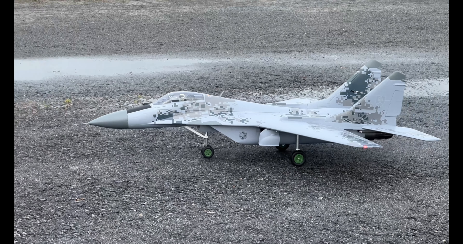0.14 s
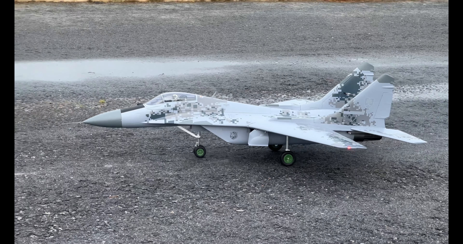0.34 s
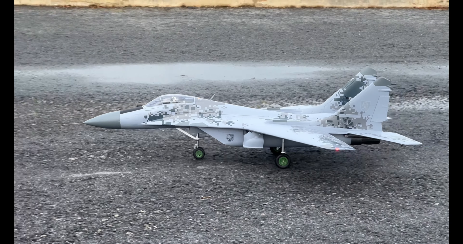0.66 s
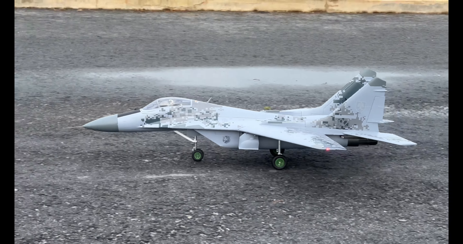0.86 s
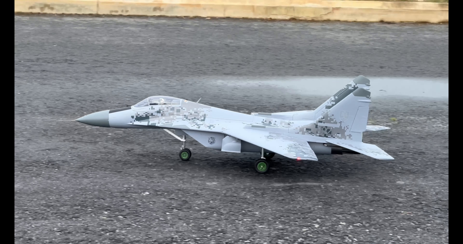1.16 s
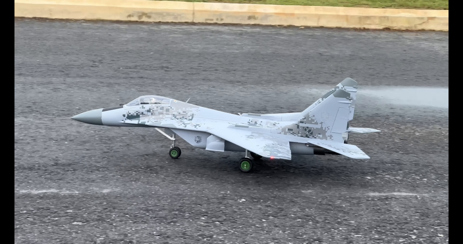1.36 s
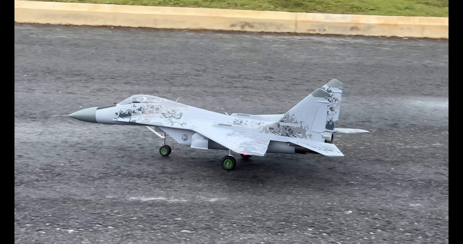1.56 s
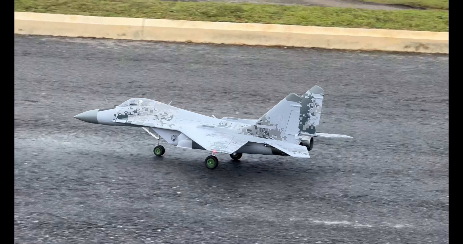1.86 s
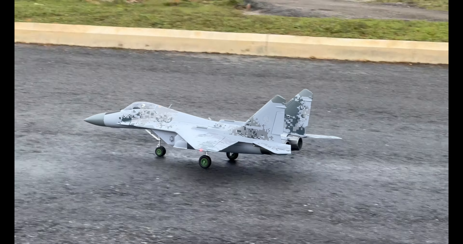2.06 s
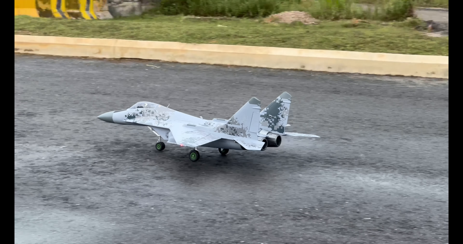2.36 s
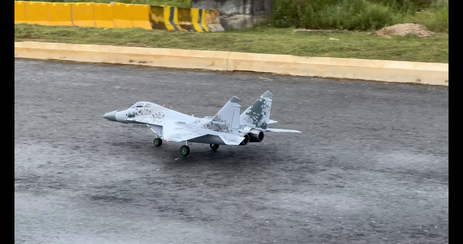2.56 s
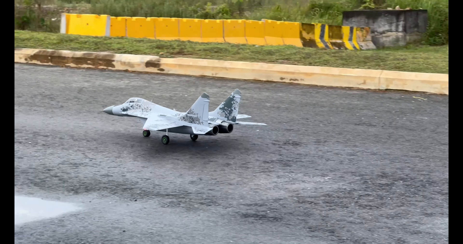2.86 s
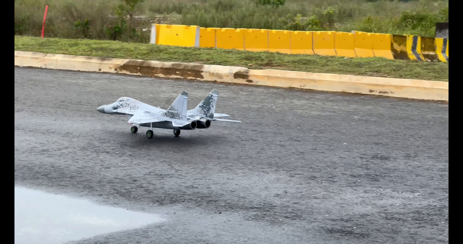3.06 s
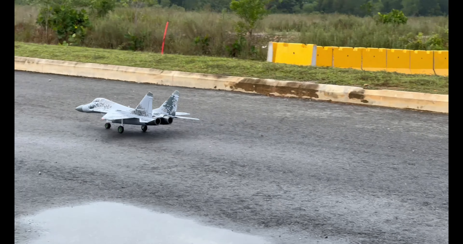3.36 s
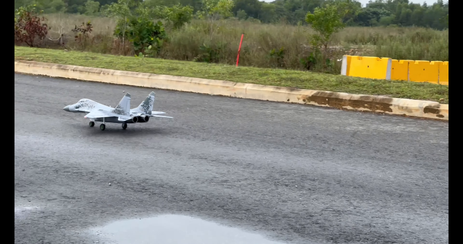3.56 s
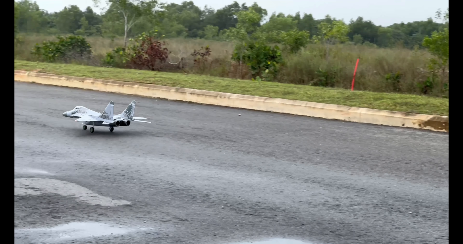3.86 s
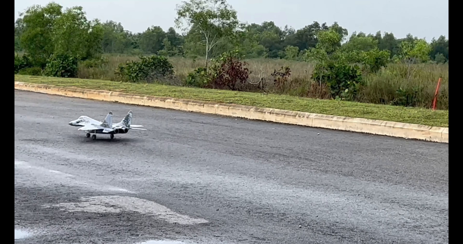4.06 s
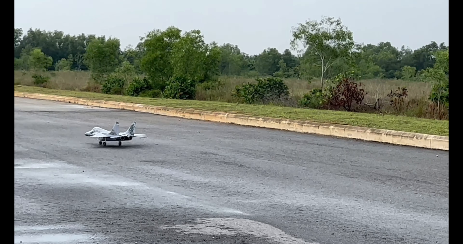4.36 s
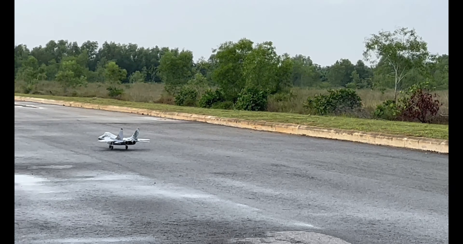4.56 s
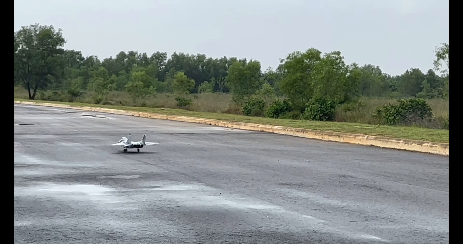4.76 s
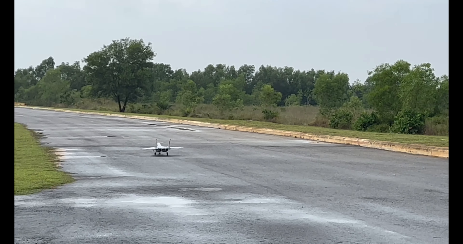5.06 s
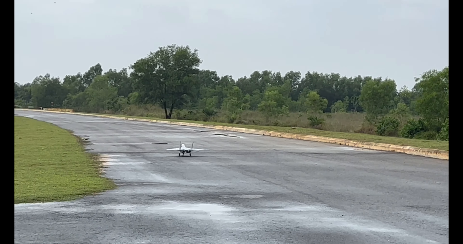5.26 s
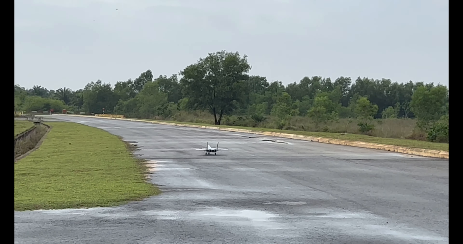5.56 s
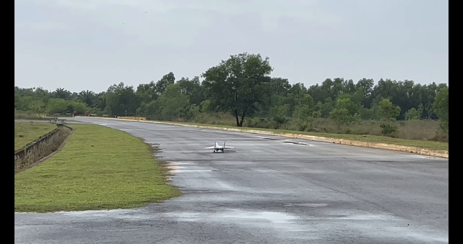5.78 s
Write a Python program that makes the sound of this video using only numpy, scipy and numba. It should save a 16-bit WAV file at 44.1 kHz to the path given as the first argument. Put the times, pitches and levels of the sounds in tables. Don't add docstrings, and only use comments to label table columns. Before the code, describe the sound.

Twin ducted fans start already running, with a shrill two-note whine, low rotational hum and hollow duct roar. Their pitch rises stepwise, with bright hiss growing on the way past. At full power they join into one wavering whistle, then flutter faster while fading down the open runway. Stereo phone pickup, dry and airy, with wind buffeting strongest around two seconds.

```python
import sys
import numpy as np
from scipy import signal
from scipy.fft import rfft, irfft
from scipy.io import wavfile
from scipy.ndimage import uniform_filter1d
from numba import njit

SR = 44100
rng = np.random.default_rng(int(sys.argv[2]) if len(sys.argv) > 2 else 0)


def decibels_to_gain(level_db):
    exponent = np.asarray(level_db, float) / 20
    return 10 ** exponent


def output_pcm(signal):
    pcm = np.clip(np.atleast_2d(signal).T, -1, 1) * 32767
    wavfile.write(sys.argv[1], SR, np.round(pcm).astype(np.int16))


N = 261072
T = np.arange(N) / SR
BLADE_COUNT = 9
SOUND_SPEED = 343

# start in seconds, spool time in seconds,
# fast blade rate in Hz, slow blade rate in Hz.
THROTTLE = [(.2, .13, 3590, 3215), (.33, .07, 3650, 3276), (.57, .105, 3746, 3353), (.98, .12, 3826, 3425),
            (1.29, .11, 3915, 3497), (1.4, .18, 4008, 3556), (1.58, .1, 4109, 3616),
            (1.93, .24, 4087, 3600), (2.17, .125, 4268, 3701), (2.52, .14, 4385, 3765),
            (2.77, .12, 4470, 3815), (2.94, .13, 4494, 3890), (3.08, .07, 4488, 3876),
            (3.21, .1, 4700, 3965), (3.31, .11, 5025, 4185), (3.42, .13, 5300, 4410),
            (3.55, .14, 5430, 4512), (3.69, .05, 5433, 4560), (3.74, .12, 5433, 4899),
            (3.86, .16, 5433, 5375), (4.02, .05, 5433, 5422)]
# fast in Hz, slow in Hz.
TAXI_HZ = (3310, 3025)
# time in seconds, slow fan below the fast one in Hz, its level against it in dB.
FULL_POWER_BEAT = [
    (4.09, 11, -18),
    (4.6, 3, -18),
    (4.85, 12, -9),
    (5.05, 16, -3),
    (5.3, 22, -3),
    (5.55, 27, -1),
    (5.92, 36, -2),
]
# time in seconds, speed in m/s.
RECEDE_SPEED = [(3.75, 0), (4.26, 4.35), (4.44, 4.6), (4.59, 6.4), (4.75, 6.8), (4.92, 9.3), (5.18, 11.7),
                (5.5, 12.6), (5.92, 14.9)]
# time in seconds, bearing of the phone from the nose in degrees,
# loss with distance in dB.
PATH = [(0, 80, 0), (1, 95, 0), (2, 112, 0), (3, 135, 0), (3.7, 150, 0), (4.35, 164, 0), (4.6, 169, 0),
        (4.8, 172, -2.5), (5.1, 175, -3), (5.4, 177, -7.5), (5.75, 179, -5.5), (5.92, 180, -6.5)]
# loudest bearing in degrees, level there in dB, fall ahead of it in dB per degree,
# fall behind it in dB per degree, most lost in dB.
BEAMS = dict(belly=(80, -13, .1, .115, 9), duct=(100, -22.5, .2, .03, 8), nozzle=(141, -19.5, .06, .15, 8),
         rush=(174, -19, .055, .5, 8), low=(178, -23, .065, .1, 8), blade=(135, -19, .13, .7, 9),
         tip=(150, -28.5, .2, .9, 14), sizzle=(163, -21.5, .145, 2.5, 9.5), mid=(104, -20.5, .33, .04, 9),
         haze=(170, -21, .035, .4, 7))
# time in seconds, half length in seconds, change in dB.
GROUND_ECHO = dict(belly=[(.1, .35, 1.5), (1.9, .2, -2)], duct=[(1.1, .5, 3), (2.5, .25, 2),
               (3.65, .2, 2.5), (3.95, .08, -2)], nozzle=[(.1, .3, -4), (.8, .3, 2), (2.05, .3, -5),
               (4.5, .15, -3)], rush=[(.05, .25, -4), (1.9, .4, -2.5), (4.1, .2, 1.5), (4.5, .2, -1.5)],
               low=[(2.1, .5, -9), (2.9, .5, -4)], blade=[(2.4, .3, 1.5), (4, .3, -2), (5.8, .4, 3)],
               tip=[(.7, .3, -3), (2.4, .6, -4)], sizzle=[(1.2, .4, 1.5), (2.45, .45, 2.5),
               (3.2, .12, -2.5), (3.65, .2, 1.5), (.1, .5, -3.5), (5.15, .25, -1.5)], mid=[(5.35, .3, -7),
               (2.8, .5, -3)], haze=[(2.7, .3, -4), (3.45, .55, -14)])

# blade tone, 2nd and 3rd multiple, all in dB.
FAST_FAINT_DB = (-39, -42, -50)
SLOW_FAINT_DB = (-40, -46, -51)
# time in seconds, half length in seconds, level in dB.
FAST_TONE = [(.3, .07, -22), (.44, .13, -27.5), (.62, .13, -22), (.96, .13, -22.5), (1.2, .09, -35),
             (1.33, .07, -27), (1.64, .07, -28), (1.77, .15, -23.5), (2.06, .13, -28), (2.31, .14, -26.5),
             (2.52, .14, -27.5), (2.9, .1, -30), (3.08, .2, -28), (3.41, .1, -26), (3.54, .1, -22),
             (3.76, .15, -28), (3.93, .08, -23), (4.02, .05, -28), (4.12, .045, -20), (4.21, .04, -20),
             (4.335, .055, -21), (4.42, .035, -25), (4.5, .06, -25), (4.6, .09, -18), (4.73, .08, -28),
             (4.87, .1, -26), (5.03, .1, -22), (5.2, .15, -32), (5.72, .35, -31)]
FAST_UPPER = [
    [(.13, .15, -37), (.35, .06, -29), (.48, .14, -25), (.9, .35, -41), (3.3, .07, -29), (3.9, .5, -35), (4.3, .06, -30), (4.48, .05, -35), (4.7, .07, -35), (5.6, .1, -42)],
    [(.45, .15, -36), (.95, .3, -41), (1.3, .2, -33), (1.8, .15, -41), (2.15, .15, -31), (2.47, .22, -29), (2.9, .3, -33), (3.33, .09, -22), (3.46, .07, -32)],
]
SLOW_TONE = [(.05, .22, -24), (.26, .1, -27), (.7, .38, -32), (1.05, .1, -36), (1.28, .07, -32),
             (1.45, .07, -28), (1.6, .07, -27), (1.95, .3, -33), (2.23, .13, -32), (2.45, .14, -33),
             (3.08, .2, -33), (3.31, .07, -35), (3.45, .15, -35), (3.62, .07, -32), (3.86, .12, -26),
             (4.02, .1, -33)]
SLOW_UPPER = [
    [(.6, .3, -36), (1.25, .17, -43), (1.78, .13, -28), (2.05, .2, -35), (2.5, .3, -42), (3.77, .1, -42)],
    [(1.38, .06, -41), (1.72, .17, -31), (1.97, .2, -30), (2.3, .25, -29), (2.62, .2, -29), (2.9, .18, -27), (3.9, .1, -41)],
]
# time in seconds, half length in seconds, level in dB.
FAST_SHAFT = [
    (.3, .14, -19),
    (.5, .1, -21.5),
    (.85, .15, -27),
    (1.6, .15, -24),
]
# time in seconds, level in dB.
SLOW_SHAFT = [(0, -28), (.3, -23), (.9, -22), (1.3, -26), (1.65, -22), (2.2, -38), (2.6, -31), (3.8, -36),
              (4.05, -27), (4.9, -29), (5.2, -34), (5.92, -36)]

# centre in Hz, width in Hz, level in dB.
LOW_HISS = [(2054, 1200, 4), (2830, 2100, 2)]
BLADE_HISS = [(5980, 840, 0.9), (7060, 730, -0.54)]
TIP_HISS = [(8500, 1300, 0), (9700, 1400, 0)]
SIZZLE = [(11000, 1600, 1), (12400, 1800, -1), (13900, 1800, -1), (15300, 1800, -4)]
HAZE_BED = [(3600, 2100, 0), (5080, 1300, 0)]
BELLY = [(415, 70, 1), (345, 80, -3), (265, 80, -5.5)]
DUCT_BED = [(747, 83, -3.5), (1150, 300, .7), (1820, 280, -4.5)]
# time in seconds, half length in seconds, shift in Hz.
NOZZLE_BEND = [(4.1, .85, -100)]
RUSH_BEND = [
    (.7, .7, 250),
    (1.55, .3, -180),
]

# time in seconds, half length in seconds, level in dB.
GUSTS = [(.2, .06, -27), (.33, .06, -29), (1.27, .08, -22), (1.38, .1, -25), (1.62, .15, -26),
         (1.88, .06, -14), (2.02, .14, -15), (2.42, .17, -27), (2.85, .04, -33), (3.12, .1, -31),
         (4.1, .2, -35), (4.53, .06, -27), (4.77, .1, -33), (5.15, .1, -28), (5.6, .35, -36)]
# centre in Hz, width in Hz, level in dB.
WIND_COLOUR = [(52, 14, -4), (64, 20, 1), (85, 30, 0), (130, 70, -11)]
FIELD_RUMBLE = [(129, 60, 0), (190, 76, 0)]
# frequency in Hz, left ahead of right in radians.
PORT_PHASE = [(0, 0), (2600, 0), (3300, .6), (4300, 0), (8800, 0), (9000, -1.4), (9800, -2.7),
              (10400, -3.45), (11800, -6.0), (12300, -6.5), (13400, -8.8), (14200, -9.9), (15200, -11.9),
              (15700, -12.57)]
# frequency in Hz, diffuse part that differs in dB, left louder than right in dB.
PORT_SPREAD = [(50, -30, .3), (130, -18, 1.5), (350, -26, .6), (800, -19, 1.2), (1500, -23, .1),
               (2300, -25, 0), (3400, -14, -.3), (4600, -21, 0), (7000, -29, 0), (12000, -24, 0)]


def fans():
    fast_hz, slow_hz = blade_rates()
    fast_db = tone_levels(FAST_TONE, FAST_UPPER, FAST_FAINT_DB)
    slow_db = tone_levels(SLOW_TONE, SLOW_UPPER, SLOW_FAINT_DB)
    below_hz, below_db = columns(FULL_POWER_BEAT)
    met = T > FULL_POWER_BEAT[0][0]
    slow_hz = uniform_filter1d(np.where(met, fast_hz - below_hz, slow_hz), size=600)
    slow_db = uniform_filter1d(np.where(met, fast_db + below_db, slow_db), size=600)
    fast_db = fast_db - met * 10 * np.log10(1 + decibels_to_gain(2 * below_db))
    tones = whistle(fast_hz, fast_db) + whistle(slow_hz, slow_db)
    slow_hum = whistle(slow_hz / BLADE_COUNT, columns(SLOW_SHAFT))
    fast_hum = whistle(fast_hz / BLADE_COUNT, [swells(FAST_SHAFT, faint_db=-45)])
    return tones + slow_hum + fast_hum + blade_noise(fast_hz)


def blade_rates():
    rows, held = [], TAXI_HZ
    for s, spool, *reached in THROTTLE:
        rows += [(s, *held), (s + spool, *reached)]
        held = reached
    rates = uniform_filter1d(np.array(columns(rows)), size=1200)
    return rates / (1 + columns(RECEDE_SPEED)[0] / SOUND_SPEED)


def tone_levels(tone, upper, faint_db):
    return np.array([swells(rows, faint) for rows, faint in zip((tone, *upper), faint_db)])


def whistle(hz, levels_db):
    phase = 2 * np.pi * np.cumsum(hz * (1 + .0004 * walk(rate=40))) / SR
    gains = [decibels_to_gain(db + 1.5 * walk(rate=20)) for db in levels_db]
    return sum(np.sqrt(2) * gain * np.sin((k + 1) * phase) for k, gain in enumerate(gains))


def blade_noise(fast_hz):
    hiss = heard("low") * rush(LOW_HISS) + heard("blade") * rush(BLADE_HISS)
    tips = decibels_to_gain(8.5) * heard("tip") * rush(TIP_HISS)
    sizzle = decibels_to_gain(5.5) * heard("sizzle") * rush(SIZZLE)
    treble_sway = decibels_to_gain(1.4 * walk(rate=5.5))
    haze = heard("haze") * band(fast_hz, width_hz=1010) + heard("mid") * rush(HAZE_BED)
    return hiss + treble_sway * (tips + sizzle) + haze


def ducts():
    belly = heard("belly") * rush(BELLY)
    duct_hz = 572 * (1 + .012 * walk(rate=2))
    duct = heard("duct") * band(duct_hz, width_hz=80)
    nozzle = heard("nozzle") * band(915 + bumps(NOZZLE_BEND), width_hz=100)
    jet = decibels_to_gain(-4.0) * band(1470 + bumps(RUSH_BEND), width_hz=260) + decibels_to_gain(1.5) * rush(DUCT_BED)
    return belly + duct + nozzle + heard("rush") * jet


def heard(name):
    bearing, far_db = columns(PATH)
    best, top_db, ahead, behind, most_db = BEAMS[name]
    lost_db = np.maximum(ahead * (best - bearing), behind * (bearing - best))
    return decibels_to_gain(top_db - np.minimum(lost_db, most_db) + bumps(GROUND_ECHO[name]) + far_db)


def rush(shape):
    return sum(decibels_to_gain(db) * band(hz, width_hz) for hz, width_hz, db in shape) / np.sqrt(len(shape))


def band(hz, width_hz, flicker_db=1.22):
    hz = hz + np.zeros(N)
    once = svf(rng.standard_normal(N), hz, 1.43 * width_hz)
    x = svf(once, hz, 1.43 * width_hz)
    return x / x.std() * decibels_to_gain(flicker_db * walk(rate=9))


@njit
def svf(x, hz, width):
    y, b, l = np.empty(len(x)), 0., 0.
    for i in range(len(x)):
        g, k = np.tan(np.pi * hz[i] / SR), width / hz[i]
        v = (b + g * (x[i] - l)) / (1 + g * (g + k))
        b, l, y[i] = 2 * v - b, l + 2 * g * v, k * v
    return y


def swells(rows, faint_db):
    return 20 * np.log10(decibels_to_gain(faint_db) + bumps([(s, half, decibels_to_gain(db)) for s, half, db in rows]))


def bumps(rows):
    total = np.zeros(N)
    for s, half, height in rows:
        total += height * np.cos(np.pi / 2 * np.clip((T - s) / half, -1, 1))
    return total


def walk(rate):
    k = int(SR / rate)
    steps = np.repeat(rng.standard_normal(N // k + 1), k)
    return 1.02 * uniform_filter1d(uniform_filter1d(steps, k), k)[:N]


def columns(table):
    s, *rest = np.transpose(table)
    return [np.interp(T, s, c) for c in rest]


def wind():
    gusts = decibels_to_gain(swells(GUSTS, faint_db=-33)) * rush(WIND_COLOUR)
    return gusts + decibels_to_gain(-33.5) * rush(FIELD_RUMBLE)


def ports(x):
    hz = np.fft.rfftfreq(N, 1 / SR)
    lead = np.exp(.5j * np.interp(hz, *np.transpose(PORT_PHASE)))
    at, diffuse_db, tilt_db = np.transpose(PORT_SPREAD)
    diffuse, tilt = (decibels_to_gain(np.interp(np.log(hz + 1), np.log(at), c)) for c in (diffuse_db, tilt_db / 2))
    tail = rng.standard_normal(2000) * np.exp(-np.arange(2000) / 500) / np.sqrt(250)
    scatter = signal.fftconvolve(x, tail)[:N]
    direct, side = rfft(x), rfft(scatter) * diffuse
    left = irfft(direct * lead * tilt + side, N)
    right = irfft(direct / lead / tilt - side, N)
    return np.array([left, right])


def scene():
    wind_side = decibels_to_gain(-15.0) * wind() * np.array([[1], [-1]])
    return ports(fans() + ducts() + wind()) + wind_side


def band_limit(x):
    return signal.sosfilt(signal.butter(12, 17090, fs=SR, output="sos"), x)


def record(dry):
    soft = rfft(np.tanh(0.81 * dry) / .8)
    below_top = np.fft.rfftfreq(N, 1 / SR) < 15730
    mix = irfft(soft * below_top, N)
    return band_limit(mix)


dry = scene()
out = record(dry)
output_pcm(out)
```